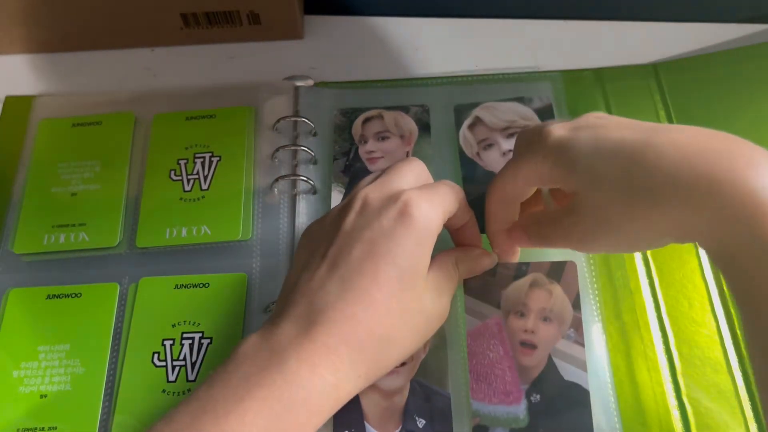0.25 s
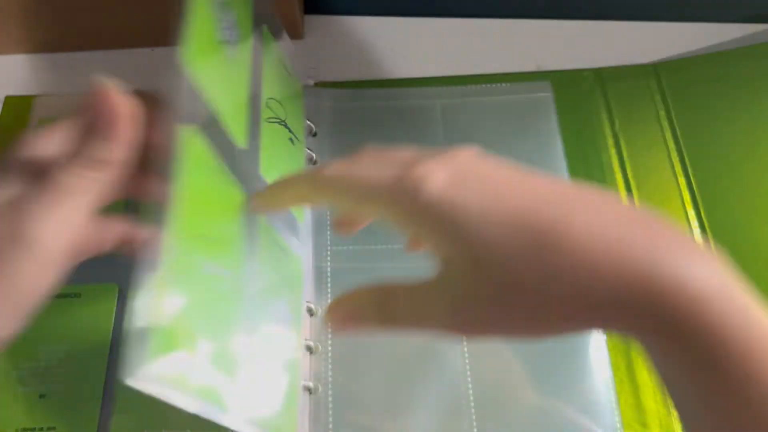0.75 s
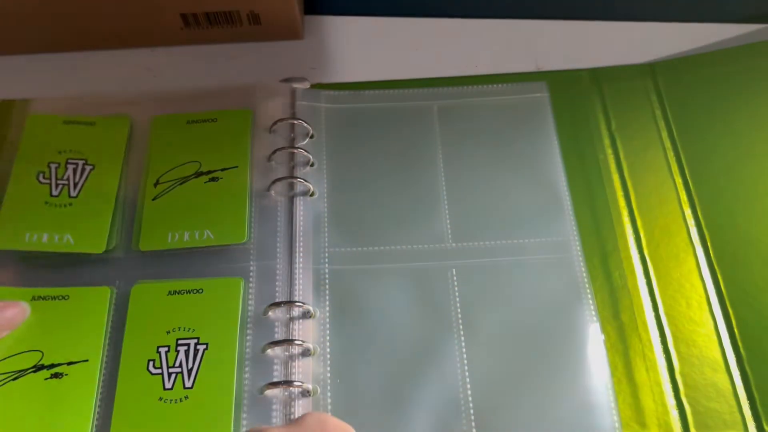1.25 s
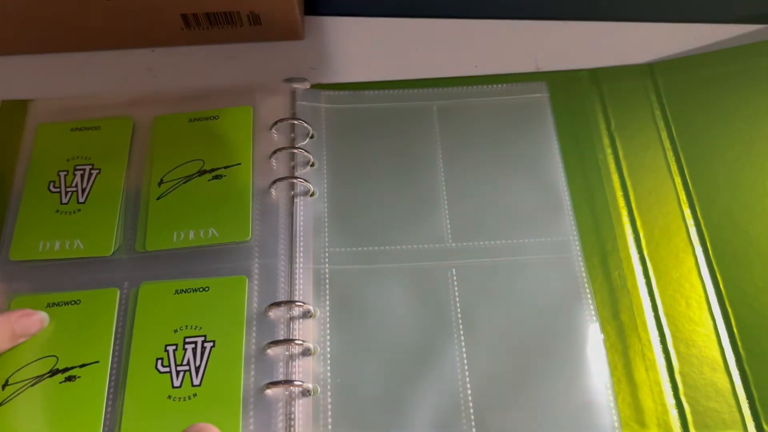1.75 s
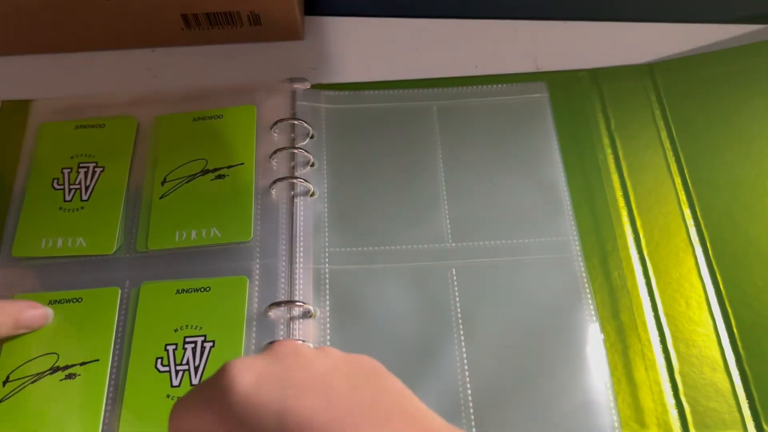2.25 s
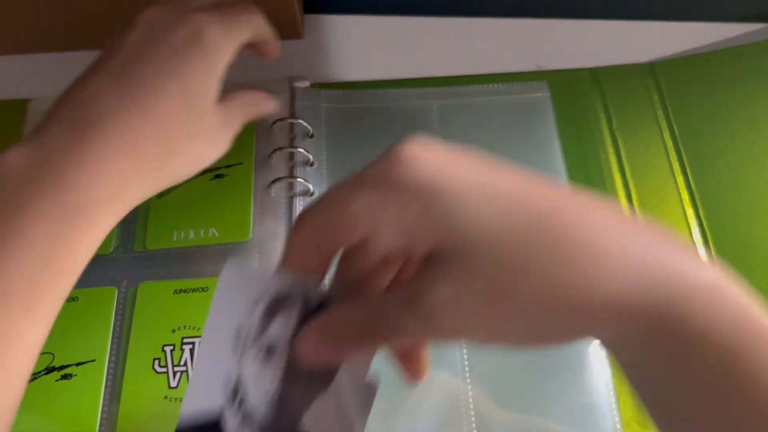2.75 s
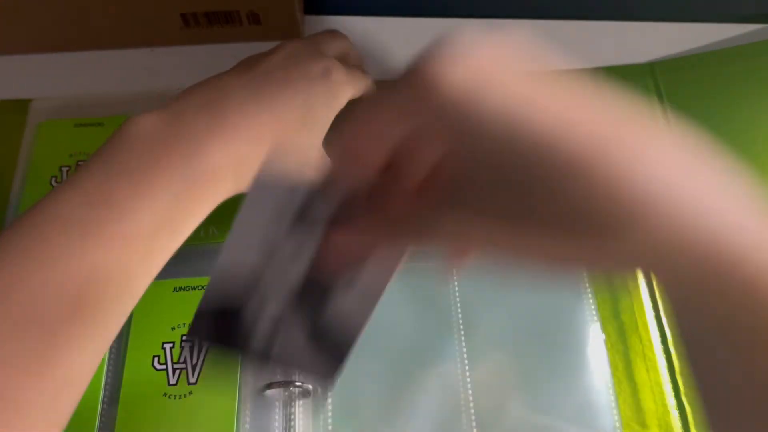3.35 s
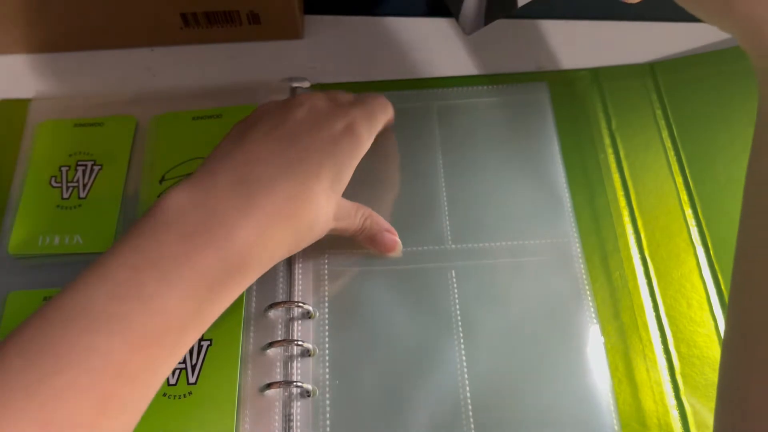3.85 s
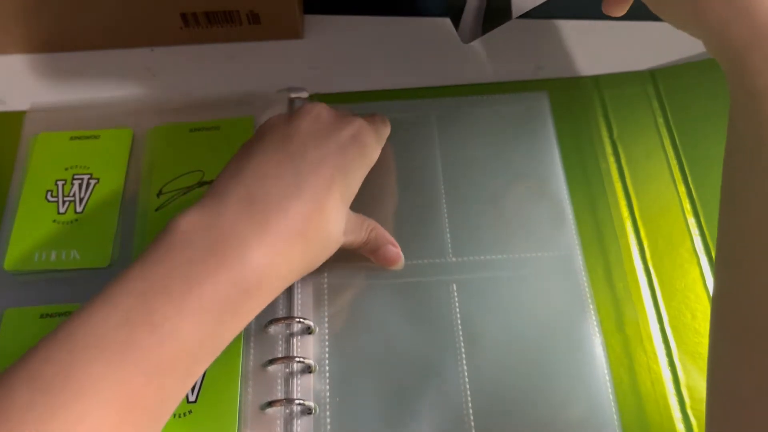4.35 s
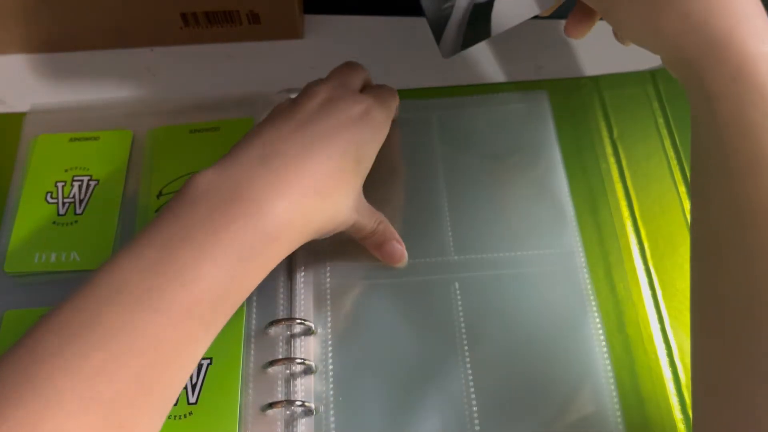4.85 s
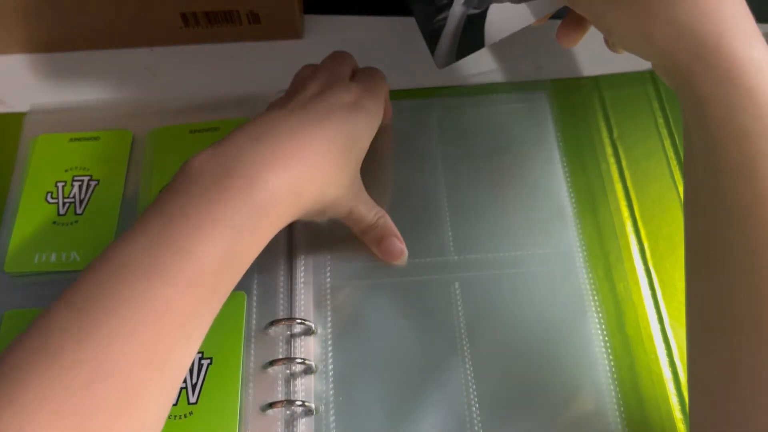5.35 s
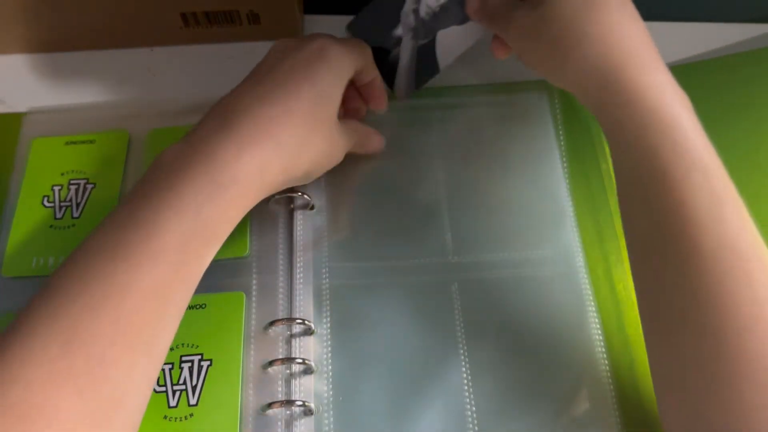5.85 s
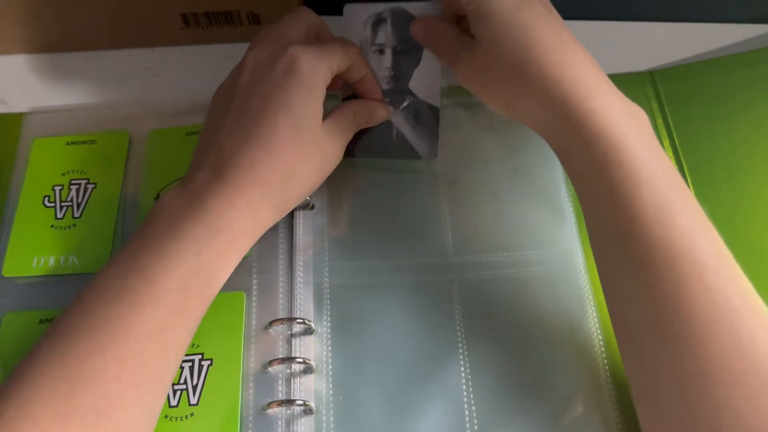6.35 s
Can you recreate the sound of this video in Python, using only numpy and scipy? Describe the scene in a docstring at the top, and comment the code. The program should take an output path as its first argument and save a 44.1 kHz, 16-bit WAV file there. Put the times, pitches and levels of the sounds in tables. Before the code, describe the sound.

Close, dry handling of plastic sleeves in a small indoor room, with a low engine drone coming through the walls. Crisp snaps and crinkles start at once, with more rustling until 0.6 s; the page flops over with dull thumps around 0.7 to 1.0 s. Small crackles near 1.5 s fade into faint sliding and near stillness by 2 s. At about 2.9 to 3.5 s come short rustles, a soft thud and light snaps. A tiny, faint descending squeak passes at 4.2 s, a tap at 4.8 s, then a loud bright click with a knock at 5.17 s. From 5.35 s to the end the film crackles busily, with a thud at 5.66 s and a tap at 6.39 s. The engine gradually sinks, drops quickly around 5 s, almost vanishes near 5.8 s, then revs briefly from 6.2 s with a slight rasp.

```python
"""Hands turn a page of plastic card sleeves in a ring binder on a desk, then work a card into a pocket.
The film flexes, rubs and crinkles as coloured friction noise, snaps in short bursts and squeaks once by
stick and slip; page and fingers knock on the binder, a bank of decaying modes. An engine outside, a stack
of tones locked to its turning rate, drones through the walls, slows and revs once.
A phone close above hears it all in a small room with a dense noise tail and still air."""
import sys
import numpy as np
from scipy import signal
from scipy.fft import rfft, irfft
from scipy.io import wavfile
from scipy.ndimage import uniform_filter1d, map_coordinates

SR = 44100
rng = np.random.default_rng(int(sys.argv[2]) if len(sys.argv) > 2 else 0)


def store_wav(level_fs):
    """Save 16-bit WAV to argv[1]."""
    pcm = np.round(np.clip(np.atleast_2d(level_fs), -1, 1) * 32767)
    wavfile.write(sys.argv[1], SR, pcm.T.astype(np.int16))


N = 291501
T = np.arange(N) / SR  # time in seconds

# Strokes of the hands over the film. Each row: start in seconds, length in seconds, page flexing in dB,
# rubbing in dB, crinkling in dB, tautness as level of the finest creases over the creased edge in dB.
STROKES = [(-0.03, 0.074, -62.5, -62, -61.5, -1), (0.223, 0.065, -83, -63, -65.5, -6),
           (0.306, 0.1, -62, -60, -74.5, -2), (0.421, 0.38, -72, -71.5, -74, -3),
           (0.708, 0.061, -62, -67.5, -68.5, 1), (0.788, 0.22, -63.5, -66.5, -66, 2),
           (0.951, 0.12, -68.5, -71, -72.5, 1), (1.056, 0.22, -79, -74.5, -75, -2.5),
           (1.246, 0.36, -89.5, -83.5, -78, -3.5), (1.44, 0.19, -69.5, -68, -64.5, -10),
           (1.367, 1.46, -76, -74, -84, 3), (1.763, 0.073, -81, -78, -77, -3),
           (1.953, 0.2, -93, -95.5, -76.5, -3), (2.445, 0.41, -74.5, -86, -78.5, 6.5),
           (2.865, 0.35, -70.5, -74.5, -72.5, -1.5), (3.032, 0.2, -65.5, -68.5, -73, -2),
           (3.24, 0.07, -63.5, -70.5, -70, 3), (3.273, 0.44, -78, -88.5, -81.5, 4.5),
           (4.027, 0.42, -76, -77, -84, 0), (4.181, 0.17, -68.5, -69.5, -73, -8),
           (5.321, 0.061, -71, -74.5, -58, 1), (5.364, 0.15, -66, -81, -61, -29),
           (5.458, 0.24, -86, -73, -67.5, -2), (5.605, 0.11, -69.5, -57.5, -56.5, -7),
           (5.758, 0.085, -72, -70, -66, 3), (5.8, 0.4, -70.5, -65, -68, 0.5),
           (6.056, 0.042, -56, -56, -69, 1), (6.11, 0.34, -68.5, -68, -70.5, -3.5),
           (6.372, 0.29, -61, -64, -60.5, -0.5)]
ATTACK_SHARE, RELEASE_SHARE = 0.27, 0.51  # shares of a stroke spent speeding up and slowing down
GLIDE_S = 0.43  # strokes longer than this mostly glide; shorter ones catch and crackle
CATCH_DB = -75.5  # crinkle level under which the film mostly slides without catching
# Colours of flexing page, rubbed sheet, creased edge and finest creases.
# Each row: frequency in Hz, density in dB per Hz.
FLEX_COLOUR = [(120, 2.5), (220, -1), (420, 2.5), (590, 0), (760, -1), (1080, 1.5), (1500, -22.5),
               (2500, -42.5)]
SHEET_COLOUR = [(600, -27.5), (900, -8.5), (1100, 0), (1450, 6.5), (2100, 5.5), (2350, 1), (2750, -1),
                (3500, -15.5), (7000, -38.5)]
EDGE_COLOUR = [(2200, -26.5), (3400, 2), (4600, 1), (6500, -3.5), (8500, -0.5), (10000, -4), (12000, -18.5)]
FIZZ_COLOUR = [(8000, -59), (10500, -4.5), (11800, 8), (13000, 4), (14600, 4), (15700, 1.5), (17000, -38)]

# Engine speed. Each row: time in seconds, turns per second in Hz.
ENGINE_SPEED = [(0, 64.48), (0.8, 62.04), (1.6, 60.64), (2.4, 57.06), (3.03, 54.65), (4.34, 49.62),
                (4.81, 46.53), (4.92, 43.43), (5.13, 36.61), (5.3, 31.44), (6.1, 30.17), (6.22, 32.86),
                (6.3, 36.1), (6.4, 36.76), (6.47, 37.8), (6.54, 33.4), (6.6, 31.1)]
# Engine throttle. Each row: time in seconds, opening from 0 to 1.
THROTTLE = [(0, 0.49), (2.1, 0.56), (2.9, 0.7), (3.6, 0.52), (4.55, 0.43), (5.05, 0.58), (5.3, 0.51),
            (5.75, 0), (6.06, 0.17), (6.27, 0.89), (6.43, 0.88), (6.54, 0.79), (6.6, 0.84)]
IDLE_DB, THROTTLE_DB = -56, 33  # engine level with the throttle shut, and its gain when wide open
HARD_FROM = 0.59  # opening above which the firings harden
# Engine overtones. Each row: multiple of the turning rate, level in dB before walls and throttle.
OVERTONES = [(2.5, -28), (3, -14), (3.5, -22.5), (4, -17), (5, -32), (6, -14.5), (8, -9.5), (12, -13)]
# What the walls let through of the overtones. Each row: frequency in Hz, gain in dB.
WALLS = [(90, -4.5), (115, 9.5), (138, 6.5), (165, -23.5), (200, -10), (228, -15), (280, -40)]
# Rasp under throttle, as the walls let it through. Each row: frequency in Hz, density in dB per Hz.
RASP_COLOUR = [(170, -15), (250, 0.5), (425, -7.5), (455, 7.5), (500, -13.5), (900, -35)]
# Bass resonances of the room. Each row: frequency in Hz, width in Hz, gain in dB.
BOOMS = [(48.35, 4.3, -11), (55.53, 5.5, -5.5), (58.57, 1.5, -4), (61.98, 2.1, -4), (77.5, 18.2, -1.5),
         (88, 6.8, -4.5), (103.48, 3.7, 3), (108.7, 5.93, -1), (121.98, 2.93, -6.5), (128.63, 1.87, -3.5)]
BOOM_FLOOR_DB = -29.5  # gain between the resonances
# Brief dips of the lowest engine tone. Each row: time in seconds, depth in dB.
DIPS = [(0.22, -10), (0.88, -10), (1.32, -7.5), (2.42, -7)]
DIP_S = 0.069  # time from the middle of a dip to 1/e of its depth
# Standing waves favour one port or the other. Each row: frequency in Hz, left minus right in dB.
STANDING_WAVES = [(75, 0.3), (91, -6.5), (98, -17.5), (103, -1.5), (107, 4.5), (113, 6.5), (122, -2)]

# Still room. Each row: frequency in Hz, density in dB per Hz.
AIR_COLOUR = [(25, -11.5), (45, 3), (62, 13.5), (90, 3), (125, 14.5), (170, -5), (300, -21), (700, -25),
              (1350, -29), (1780, -17.5), (2500, -35.5), (8000, -42), (16000, -41.5)]
AIR_DB = -58.5
# Reverberation. Each row: frequency in Hz, level against the direct sound in dB, t60 in seconds.
ROOM_BANDS = [(158, -3, 0.15), (500, -1.5, 0.23), (1640, -10, 0.23), (4076, -6, 0.29), (8500, -5.5, 0.26),
              (13900, -18, 0.29)]

# The film buckles or a card edge flicks. Each row: time in seconds, sheet pitch in Hz, level in dB,
# dull body in dB, sharpness in dB, time scale of the fold in seconds; body and sharpness relative to level.
SNAPS = [(0.0274, 2190, -34, -16, -11.5, 0.0021), (0.0279, 7800, -40, -37, -41, 0.0014),
         (0.0820, 1690, -43, -17.5, -58, 0.0027), (0.263, 1690, -46, -2, -31, 0.003),
         (0.33, 1320, -45.5, -18, -81, 0.0012), (0.346, 1250, -46.5, 0.5, -70, 0.0022),
         (0.3647, 1480, -50, 3.5, -40, 0.0054), (0.498, 2380, -54, -14, -9, 0.0037),
         (0.535, 2040, -56.5, -11, -17, 0.0022), (0.5523, 2920, -58, -15, -24, 0.0031),
         (0.561, 2740, -54, -14, 0, 0.0051), (0.568, 2580, -54.5, -6, -3, 0.01),
         (0.616, 2670, -58, -6, 3.5, 0.009), (0.771, 1420, -59.5, 3, -12, 0.0014),
         (0.8275, 1330, -59, 9, -10, 0.0033), (0.906, 1300, -55.5, -3, -21, 0.0048),
         (0.9904, 1360, -65.5, 8, -18, 0.0017), (1.1342, 3640, -58, -13, -12, 0.0025),
         (2.8891, 1690, -56.5, -2.5, -11, 0.0024), (3.0094, 1760, -44, -21, -36, 0.0016),
         (3.019, 1790, -58, -10, -45, 0.0027), (3.0686, 1930, -53.5, 0, -1.5, 0.0018),
         (3.107, 1580, -55, 3, -28, 0.0047), (3.4667, 1910, -46.5, -11, -11.5, 0.0023),
         (4.8333, 2270, -50.5, -8, -6, 0.0018), (5.165, 2310, -35.5, -3.5, 10, 0.0013),
         (5.3619, 2250, -38.5, -10, -1.5, 0.0042), (5.4023, 2400, -41, -11.5, -42, 0.0013),
         (5.4453, 2230, -45, -3, -41, 0.0024), (5.515, 2940, -59, -17, -5, 0.0067),
         (5.619, 2620, -58, -25, -10, 0.0053), (5.643, 2000, -55.5, -5.5, -8, 0.0048),
         (5.6621, 2400, -45.5, -5.5, -14, 0.0016), (5.7625, 2310, -61.5, -7, -2.5, .0025),
         (5.799, 2010, -57.5, 4, -21, 0.007), (5.904, 1500, -64, -1, -9, 0.0025),
         (5.958, 2000, -45, -11.5, -15, 0.0045), (5.971, 2170, -50.5, -1.5, -11, 0.0031),
         (6.077, 1400, -60.5, 5, -23, 0.002), (6.273, 2270, -55.5, 1, -8, 0.0052),
         (6.3896, 1900, -41.5, 4, -16, 0.0021), (6.468, 2230, -56, -10, -21, 0.0033),
         (6.537, 3120, -55.5, -13, -14, 0.0033), (6.551, 2280, -56, 4, -10, 0.0029)]
EDGE_DB, EDGE_SLOPE = -0.5, 0.57  # edge level of a sharp snap; dB lost per dB of sharpness below 0
BURST_S = 0.006  # snap and crease levels are the rms over this time
# A lone crease clicks, too small to ring the sheet. Each row: time in seconds, edge level in dB,
# top treble relative to that level in dB.
CREASES = [(0.1513, -67, 8.5), (0.489, -69, -1), (0.788, -67.5, -1), (0.848, -66.5, 2), (1.105, -68.5, -2),
           (1.412, -66.5, -19), (1.475, -66, -5), (1.4935, -56, -4), (1.511, -55, -3.5),
           (1.5699, -62.5, -5), (2.592, -77.5, 7), (2.997, -63.5, -16), (3.045, -71, 6), (3.178, -73, 4),
           (5.351, -62, 2), (5.413, -57.5, -13), (6.197, -77, 5), (6.212, -68.5, 5), (6.238, -69, 5)]
# Blows through the binder into the desk; fingertips and the flopping page are dull, a card edge is bright.
# Each row: time in seconds, level in dB, frequency above which it is dull in Hz.
KNOCKS = [(0.362, -62, 600), (0.727, -52.5, 800), (.829, -53.5, 750), (.847, -59, 1150), (.914, -44.5, 260),
          (0.997, -48, 260), (3.009, -46, 420), (4.8335, -49.5, 2500), (5.166, -34, 3010),
          (5.174, -37.5, 480), (5.664, -44.5, 262), (6.392, -45.5, 2000)]
# Modes of the binder on the desk. Each row: frequency in Hz, level in dB, t60 in seconds.
DESK_MODES = [(179, -0.5, 0.14), (221.4, -2, 0.093), (278, -8.5, 0.053), (373, -15, 0.1),
              (458.5, -4, 0.068), (770, 6, 0.03), (950, -10, 0.12), (1060, -6.5, 0.056),
              (1200, -14.5, 0.074), (2290, 3.5, 0.018)]

# Where the hands work. Each row: time in seconds, left minus right in dB where the shadow is full.
HANDS = [(0, 13), (.4, -1), (.56, 9.5), (1.5, 12.5), (3.07, 11.5), (3.47, 3.5), (5.4, 5), (5.96, 6),
         (6.4, 4)]
# How much of that difference the phone's body makes. Each row: frequency in Hz, share from 0 to 1.
SHADOW = [(400, 0), (1800, 0), (4000, 1), (8000, 0.5), (11500, 0)]
PORT_LAG_S, PORT_FROM_HZ = 0.00014, 6470  # delay of the left port, and where it sets in
TOP_HZ = 16000  # upper limit of the phone


def undb(db):
    """Level law: decibels to amplitude gain."""
    return 10 ** (np.asarray(db) / 20)


def unit(x):
    """Normalisation: scale to rms 1."""
    return x / np.sqrt(np.mean(x ** 2))


def read(points, hz, axis=1):
    """Interpolation: a column of a spectrum table on a log-frequency axis."""
    points = np.array(points, float)
    return np.interp(np.log(np.maximum(hz, 1)), np.log(points[:, 0]), points[:, axis])


def response(points, size=2048):
    """Minimum phase: the causal impulse response of a colour, folded from its cepstrum, with energy 1."""
    cepstrum = irfft(np.log(undb(read(points, np.fft.rfftfreq(size, 1 / SR)))))
    cepstrum[1:size // 2] *= 2
    cepstrum[size // 2 + 1:] = 0
    h = irfft(np.exp(rfft(cepstrum)))
    return h / np.linalg.norm(h)


def colour(x, points, size=2048):
    """Linear filtering: convolve a sound with the response of a colour."""
    return signal.fftconvolve(x, response(points, size=size))[:N]


def walk(rate):
    """Slow fluctuation: random values held 1 / rate seconds, smoothed twice and scaled to rms 1."""
    hold = int(SR / rate)
    steps = np.repeat(rng.standard_normal(N // hold + 2), hold)
    smooth = uniform_filter1d(uniform_filter1d(steps, hold), hold)
    return unit(smooth[:N])


def add(out, s, x):
    """Superposition: mix a short sound in at time s."""
    i = max(int(s * SR), 0)
    out[i:i + len(x)] += x[:max(N - i, 0)]


def grains(rate, spread_db, hiss):
    """Dry friction: tiny slips of very unequal size over a smooth hiss."""
    size = undb(spread_db * np.minimum(rng.exponential(size=N), 2.5))
    slips = (rng.random(N) < rate / SR) * size * rng.choice([-1, 1], N)
    return unit(unit(slips) + hiss * rng.standard_normal(N))


def bend(x, depth_db, patch_hz, patch_s, size=512):
    """Shifting resonance: as a sheet bends, patches of its spectrum swell and fade by chance."""
    hop = size // 4
    z = signal.stft(x, nperseg=size, noverlap=size - hop)[2]
    field = rng.standard_normal((size, z.shape[1]))
    hz = np.arange(len(z)) * SR / size
    t = np.arange(z.shape[1]) * hop / SR
    places = np.meshgrid(hz / patch_hz, t / patch_s, indexing="ij")
    gain = undb(depth_db * map_coordinates(field, places, order=1, mode="wrap"))
    return signal.istft(z * unit(gain), nperseg=size, noverlap=size - hop)[1][:N]


def effort(start, length):
    """Kinematics: the speed of one stroke, 0-1, through attack, hold and release."""
    part = (T - start) / length
    ramp = np.minimum(part / ATTACK_SHARE, (1 - part) / RELEASE_SHARE)
    return np.sin(np.pi / 2 * np.clip(ramp, 0, 1)) ** 2


def plastic(flutter, slips):
    """Source and filter: friction drives flexing page, rubbed sheet, creased edge and finest creases."""
    return np.array([colour(flutter, FLEX_COLOUR), colour(slips, SHEET_COLOUR),
                     colour(slips, EDGE_COLOUR), colour(slips, FIZZ_COLOUR)])


def handling():
    """Friction: the page flutters, film rubs on film and small creases crackle; slow strokes mostly hiss."""
    # fingers catch and let go; they can only hold so hard
    grip = unit(undb(5.6 * np.minimum(walk(70), 1)))
    slips = grains(rate=480, spread_db=4.5, hiss=.35)
    slips = bend(slips, depth_db=5, patch_hz=700, patch_s=.018)
    flutter = grains(rate=330, spread_db=2.5, hiss=0.19)
    catching, gliding = np.zeros((2, 4, N))
    for start, length, flex_db, rub_db, crinkle_db, taut_db in STROKES:
        taut = undb(taut_db)  # taut film moves the crinkle up into the finest creases
        crinkle = undb(crinkle_db) / np.hypot(1, taut)
        levels = [undb(flex_db), undb(rub_db), crinkle, crinkle * taut]
        power = np.outer(levels, effort(start, length)) ** 2
        brisk = 1 / (1 + (length / GLIDE_S) ** 2)
        rough = brisk / (1 + undb(CATCH_DB - crinkle_db) ** 2)
        catching += rough * power
        gliding += (1 - rough) * power
    crackle = grip * plastic(flutter, slips) * np.sqrt(catching)
    glide = bend(rng.standard_normal(N), depth_db=4, patch_hz=600, patch_s=.045)
    hiss = plastic(rng.standard_normal(N), glide) * np.sqrt(gliding) * undb(0.58 * walk(25))
    return (crackle + hiss).sum(0)


def boom(hz):
    """Room resonance: gain of a bass tone, the resonances adding in power."""
    power = undb(BOOM_FLOOR_DB) ** 2
    for centre, width, db in BOOMS:
        power = power + (undb(db) / (1 + (2 * (hz - centre) / width) ** 2)) ** 2
    return np.sqrt(power)


def engine(push_db=15, smooth_db=-13, low_cut_hz=41, body_db=-5, rasp_db=-30):
    """Harmonic source: two firings a turn; the walls weight the overtones, and throttle lifts level and rasp."""
    hz = np.interp(T, *np.transpose(ENGINE_SPEED))
    throttle = np.interp(T, *np.transpose(THROTTLE))
    level = undb(IDLE_DB + THROTTLE_DB * throttle)
    dip_db = sum(db * np.exp(-((T - at) / DIP_S) ** 2) for at, db in DIPS)
    turn = level * boom(hz) * undb(dip_db) / np.hypot(1, (low_cut_hz / hz) ** 10)
    fire = level * boom(2 * hz)
    phase = 2 * np.pi * np.cumsum(hz * (1 + 0.0017 * walk(29))) / SR
    tones = turn * undb(1.3 * walk(8.2)) * np.sin(phase)
    tones = tones + fire * undb(1.5 * walk(16)) * np.sin(2 * phase)
    load = level * undb(body_db)
    hard = np.clip((throttle - HARD_FROM) / (1 - HARD_FROM), 0, 1)
    for multiple, db in OVERTONES:
        # under throttle the firings grow even and hard: their upper harmonics rise, the tones between sink
        drive_db = hard * (smooth_db if multiple % 2 else push_db * np.log2(multiple / 4))
        gain = undb(db + drive_db + read(WALLS, multiple * hz) + 2 * walk(11))
        tones = tones + load * gain * np.sin(multiple * phase + rng.uniform(0, 2 * np.pi))
    # noise between the tones: frequency in Hz, density in dB per Hz
    uneven_colour = [(25, -46.5), (55, 2.0), (130, 6.5), (190, -3.5), (400, -25.5), (900, -65.0)]
    uneven = colour(rng.standard_normal(N), uneven_colour, size=8192)
    puffs = rng.standard_normal(N) * (1 + np.cos(2 * phase))  # a rush of gas with every firing
    rasp = hard * undb(rasp_db) * colour(puffs, RASP_COLOUR, size=8192)
    out = np.sqrt(2) * tones + load * (undb(-16.5) * uneven + rasp)
    half_db = np.array([[.5], [-.5]])
    pan = undb(read(STANDING_WAVES, np.fft.rfftfreq(N, 1 / SR)) * half_db)
    return irfft(rfft(out) * pan, N)


def spread(mid, side):
    """Diffuse field: the ports differ most in the middle range, less in the bass, little in the top."""
    # frequency in Hz, side level in dB
    width = [(60, -4.5), (200, -3.0), (600, 3.5), (2000, 2.5), (6000, 4.5), (9000, -14.5), (15000, -22.5)]
    width_db = read(width, np.fft.rfftfreq(N, 1 / SR))
    side = irfft(rfft(side) * undb(width_db), N)
    return mid + side * np.array([[1], [-1]])


def still_air():
    """Background noise: two independent coloured noises, spread between the ports, drift slightly in level."""
    air = spread(*(unit(colour(rng.standard_normal(N), AIR_COLOUR, size=8192)) for _ in range(2)))
    return air * undb(AIR_DB + .5 * walk(9.9))


def room(x, size=16384):
    """Reverberation: a dense tail from desk, shelves and walls, each band decaying at its own rate."""
    t = np.arange(size) / SR
    hz = np.fft.rfftfreq(size, 1 / SR)
    log_centres = np.log(np.array(ROOM_BANDS)[:, 0])
    tails = np.zeros((2, size))
    for k, (_, db, t60) in enumerate(ROOM_BANDS):
        share = np.interp(np.log(hz + 1), log_centres, np.eye(len(ROOM_BANDS))[k])
        fade = undb(-60 * t / t60) * np.clip((t - .002) / 0.0014, 0, 1)
        band = irfft(rfft(rng.standard_normal((2, size))) * np.sqrt(share))
        tails += band * fade / np.linalg.norm(fade) * undb(db)
    return spread(*(signal.fftconvolve(x, tail)[:N] / np.sqrt(2) for tail in tails))


def add_ring(out, s, burst, part, db):
    """Impulse excitation: a burst rings one part of the film at a set level."""
    ring = signal.fftconvolve(burst, part)
    add(out, s, ring / np.linalg.norm(ring) * np.sqrt(BURST_S * SR) * undb(db))


def snaps(lead_s=.0003, crackle=0.76, crackle_s=0.0049, size=1024):
    """Buckling: quick slips and a brief crackle ring the sheet, the page, its edge and its finest creases."""
    out, t = np.zeros(N), np.arange(size) / SR
    page, edge, fizz = [response(c) for c in (FLEX_COLOUR, EDGE_COLOUR, FIZZ_COLOUR)]
    for s, hz, db, body_db, sharp_db, slip_s in SNAPS:
        # the fold gathers speed, gives way, and settles
        fold = t / slip_s * np.exp(1 - 2 * (t / slip_s) ** 2)
        shape = fold + crackle * np.exp(-t / crackle_s) * (1 - np.exp(-2 * t / slip_s))
        force = rfft(rng.standard_normal(size) * shape)
        # every fold has its own peaks and hollows, about half a kilohertz apart
        bins = np.linspace(0, 44, len(force))
        peaks = undb(2.5 * np.interp(bins, np.arange(45), rng.standard_normal(45)))
        burst = irfft(force / np.abs(force) * peaks) * np.sqrt(shape)
        sheet = response([(hz / 4, -40), (hz / 2, -10), (hz, 0), (2 * hz, -20), (4 * hz, -45)])
        edge_db = EDGE_DB + EDGE_SLOPE * min(sharp_db, 0)  # a blunt snap loses its edge
        for part, part_db in ((sheet, 0), (page, body_db), (edge, edge_db), (fizz, sharp_db)):
            add_ring(out, s - lead_s, burst, part, db + part_db)
    return out


def creases(decay_s=0.0016, size=512):
    """Snap-through: a crease flips in a millisecond or two and rings only the edge and the finest folds."""
    out, t = np.zeros(N), np.arange(size) / SR
    edge, fizz = response(EDGE_COLOUR), response(FIZZ_COLOUR)
    for s, db, top_db in CREASES:
        burst = rng.standard_normal(size) * np.sqrt(t) * np.exp(-t / decay_s)
        add_ring(out, s, burst, edge, db)
        add_ring(out, s, burst, fizz, db + top_db)
    return out


def knocks(contact_s=0.00075, slap_db=-7, slap_t60=0.13, smear_hz=9):
    """Modal excitation: blows ring binder and desk and slap loose pages; a soft one wakes only low modes."""
    out, t = np.zeros(N), np.arange(SR // 3) / SR
    hz, db, t60 = np.transpose(DESK_MODES)[:, :, None]
    for s, blow_db, dull_hz in KNOCKS:
        # each blow weights and tunes the modes anew
        spot, detune = rng.standard_normal((2, len(DESK_MODES), 1))
        # loose pages chatter against the binder and keep every mode from holding its pitch
        steps = rng.standard_normal((len(DESK_MODES), len(t)))
        drift = np.cumsum(steps, axis=1) * np.sqrt(2 * np.pi * smear_hz / SR)
        tones = np.sin(2 * np.pi * hz * (1 + 0.011 * detune) * t + drift)
        modes = undb(db + spot - 60 * t / t60) * tones / np.hypot(1, (hz / dull_hz) ** 3)
        slap = rng.standard_normal(len(t)) * undb(slap_db - 60 * t / slap_t60)
        slap = colour(slap, FLEX_COLOUR)[:len(t)]
        slap = signal.sosfilt(signal.butter(3, dull_hz, fs=SR, output="sos"), slap)
        add(out, s, undb(blow_db) * (modes.sum(0) + slap) * (1 - np.exp(-t / contact_s)))
    return out


def squeak(start=4.144, end=4.348, first_hz=1700, last_hz=1477, db=-71):
    """Stick and slip: a card drags over film on an unsteady pitch that sinks as the card slows."""
    part = np.clip((T - start) / (end - start), 0, 1)
    hz = (first_hz + (last_hz - first_hz) * part) * (1 + .045 * walk(500))
    return undb(db + 2 * walk(44)) * np.sin(np.pi * part) * np.sin(2 * np.pi * np.cumsum(hz) / SR)


def scene():
    """Superposition: binder close by, engine far off, the room around the binder, still air."""
    binder = handling() + snaps() + creases() + knocks() + squeak()
    share = np.clip(read(SHADOW, np.fft.rfftfreq(N, 1 / SR)), 0, 1)
    shaded = irfft(rfft(binder) * share, N)
    pan = undb(np.interp(T, *np.transpose(HANDS)) * np.array([[.5], [-.5]]))
    near = binder + shaded * (pan - 1)
    return near + room(binder) + engine() + still_air()


def record(dry):
    """Group delay and band limit: top treble reaches the left port a little late; the phone cuts the rest."""
    hz = np.fft.rfftfreq(N, 1 / SR)
    turn = np.pi * PORT_LAG_S * np.maximum(hz - PORT_FROM_HZ, 0)  # half the phase lag, for each port
    ports = irfft(rfft(dry) * np.exp(1j * turn * np.array([[-1], [1]])), N)
    return signal.sosfilt(signal.ellip(8, .2, 70, TOP_HZ, fs=SR, output="sos"), ports)


dry = scene()
out = record(dry)
store_wav(out)
```